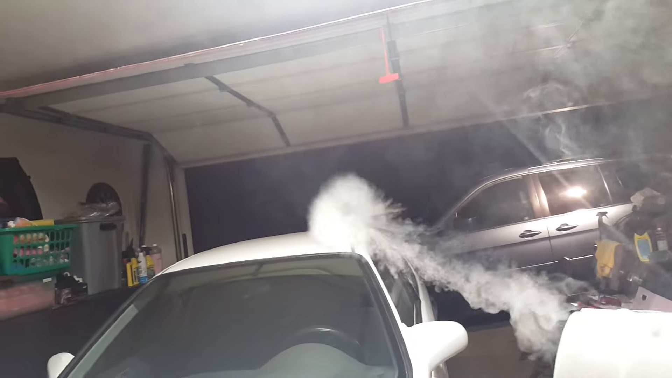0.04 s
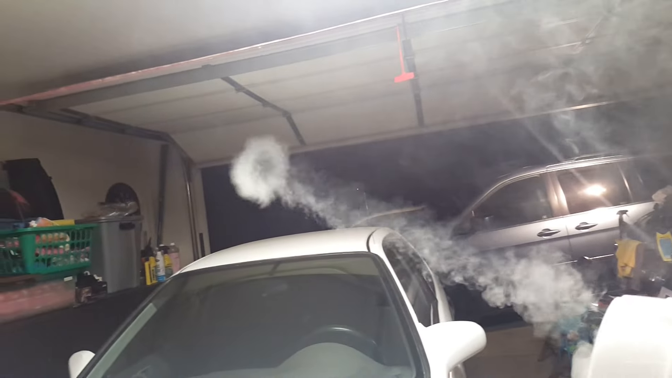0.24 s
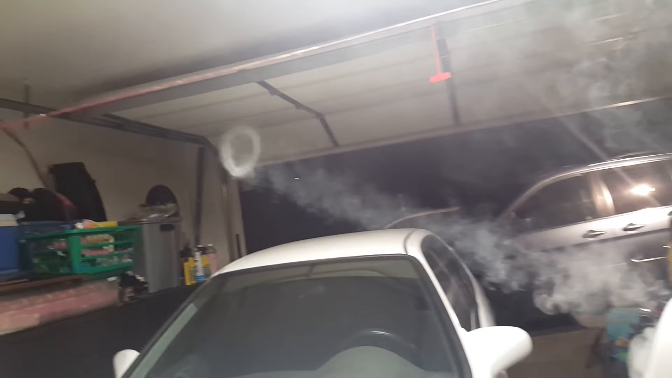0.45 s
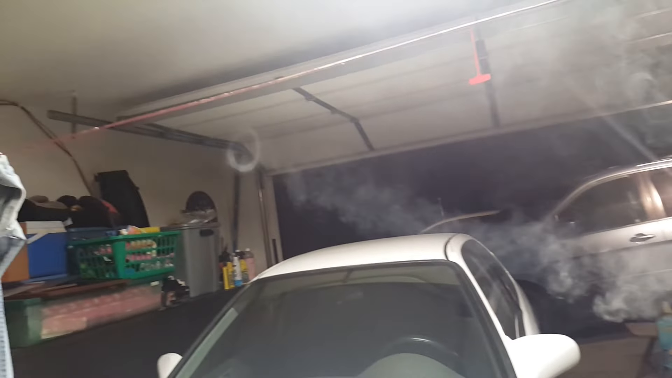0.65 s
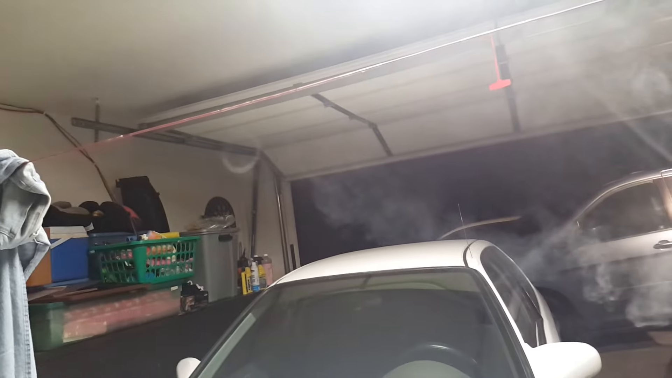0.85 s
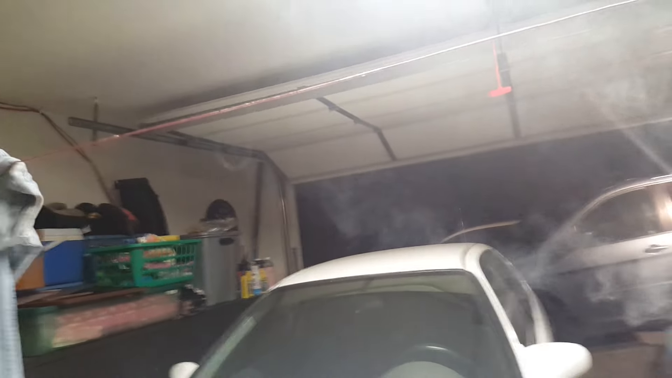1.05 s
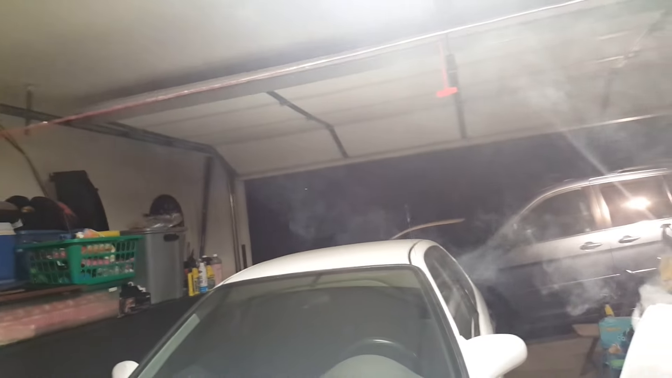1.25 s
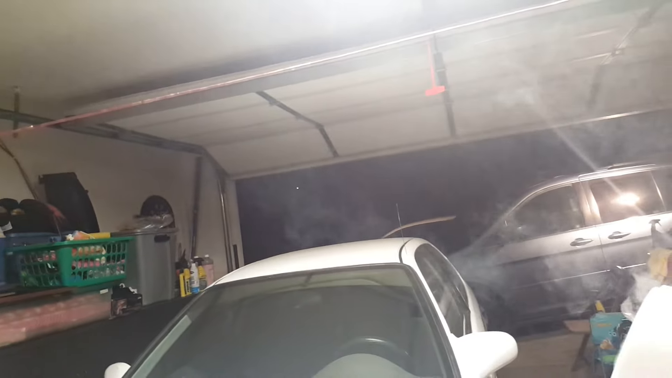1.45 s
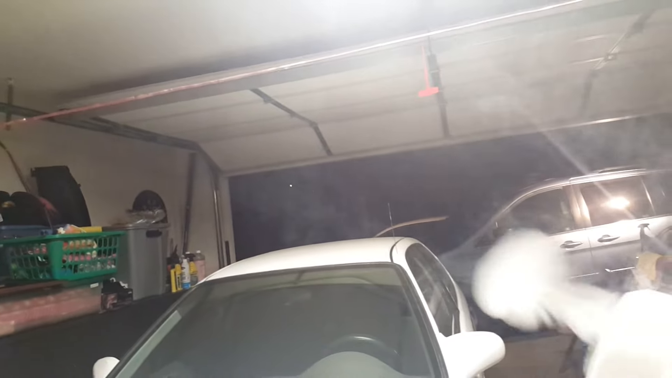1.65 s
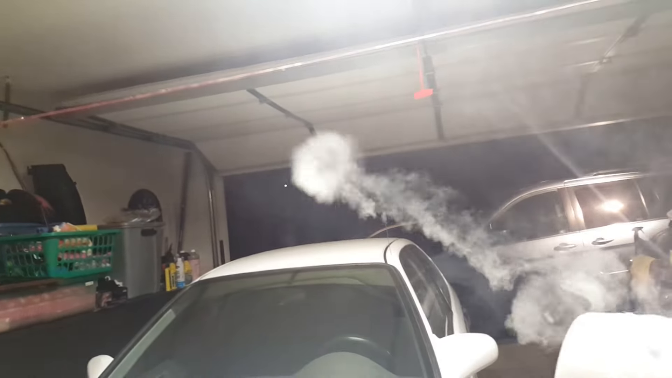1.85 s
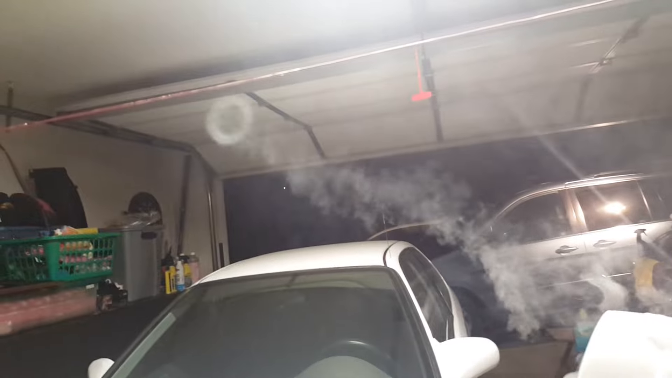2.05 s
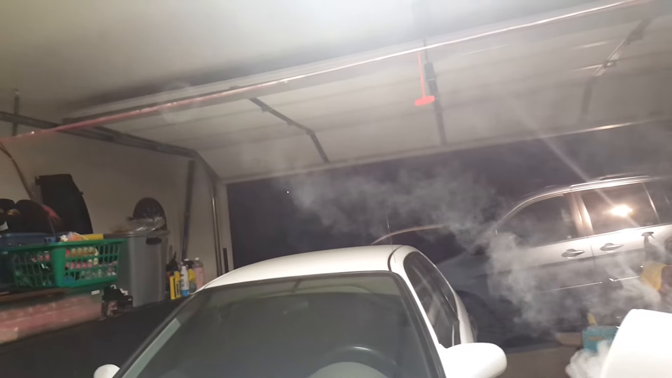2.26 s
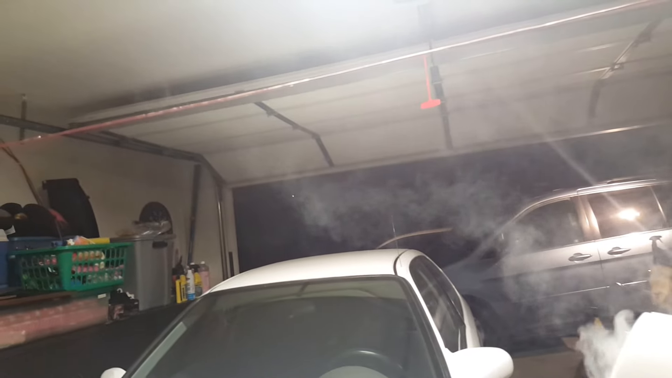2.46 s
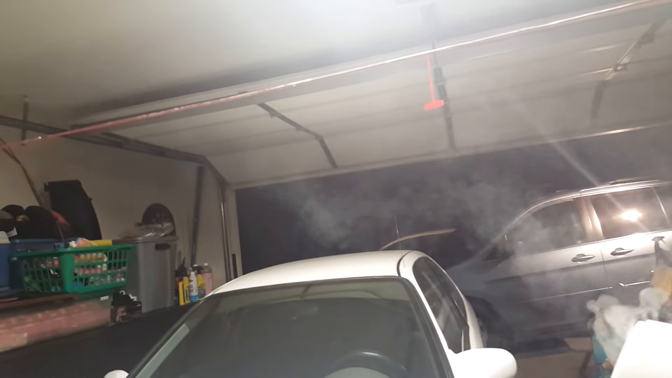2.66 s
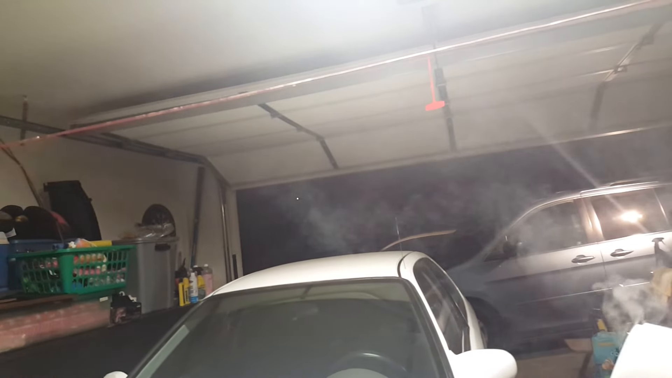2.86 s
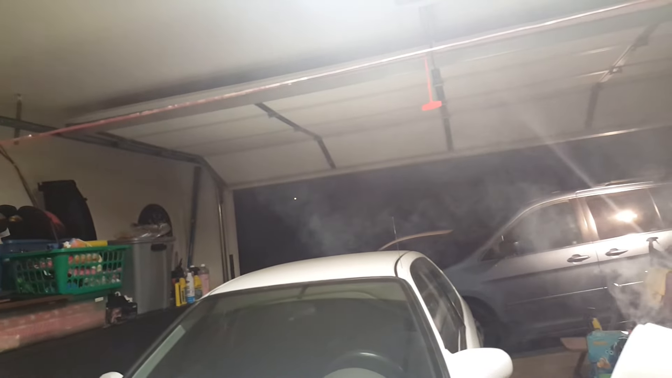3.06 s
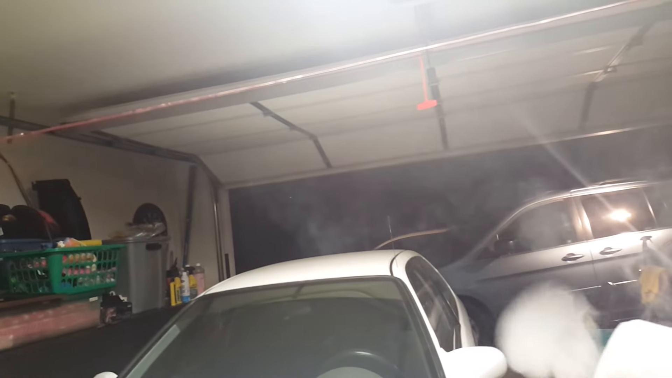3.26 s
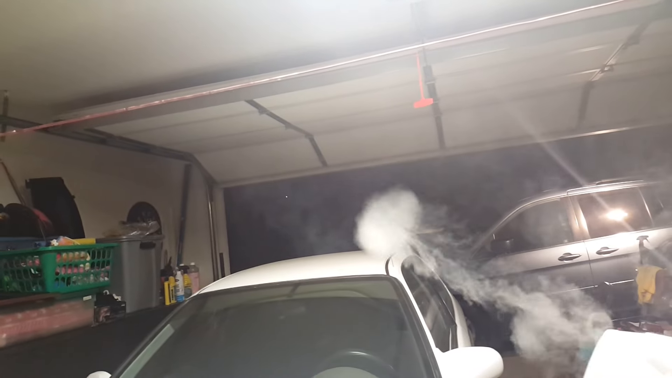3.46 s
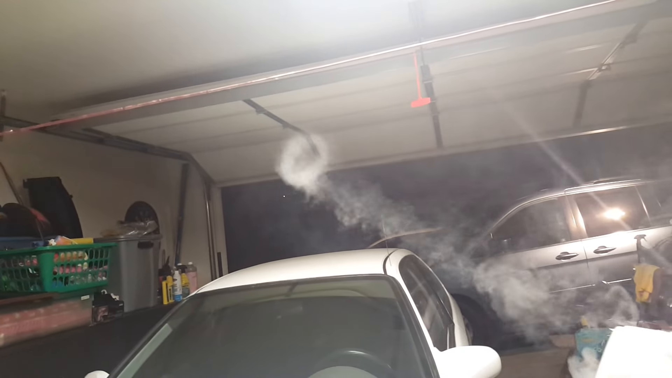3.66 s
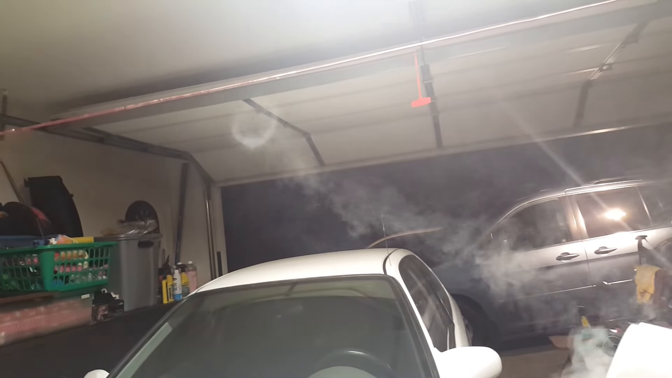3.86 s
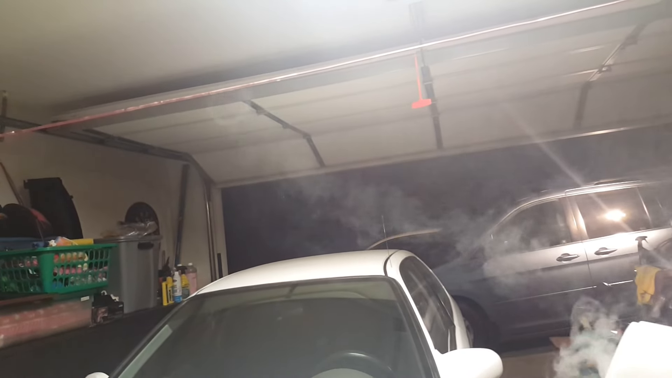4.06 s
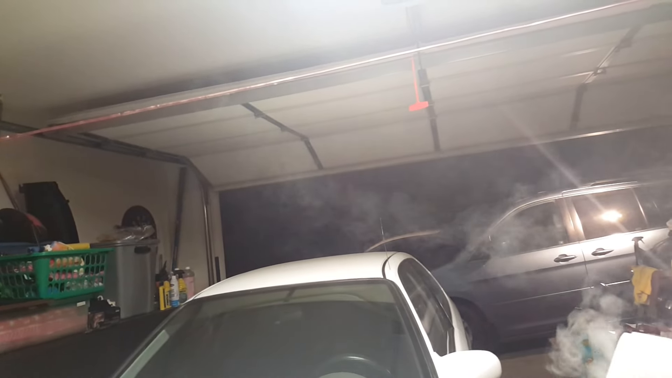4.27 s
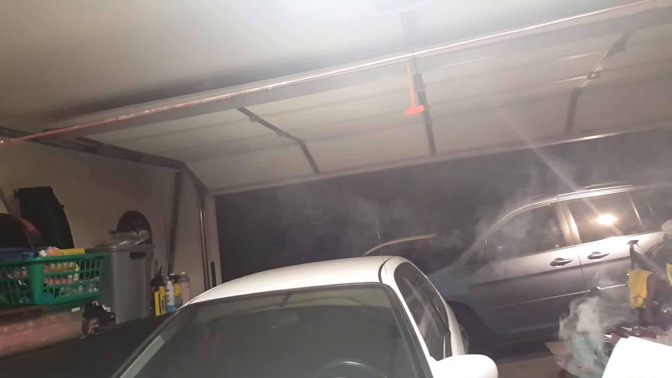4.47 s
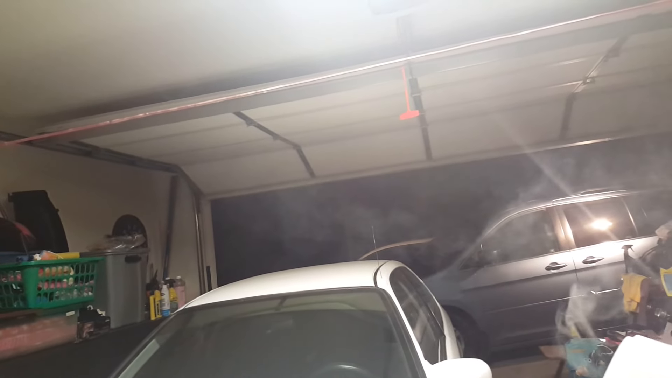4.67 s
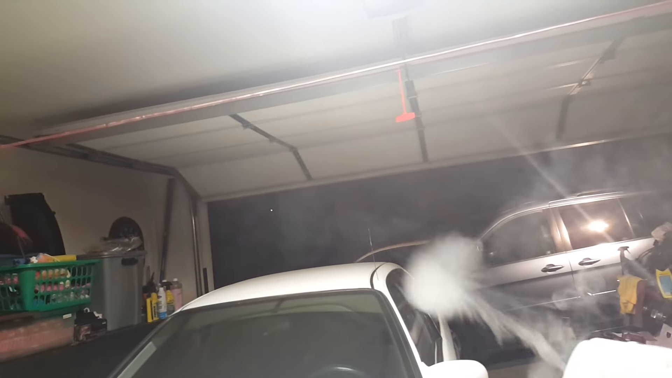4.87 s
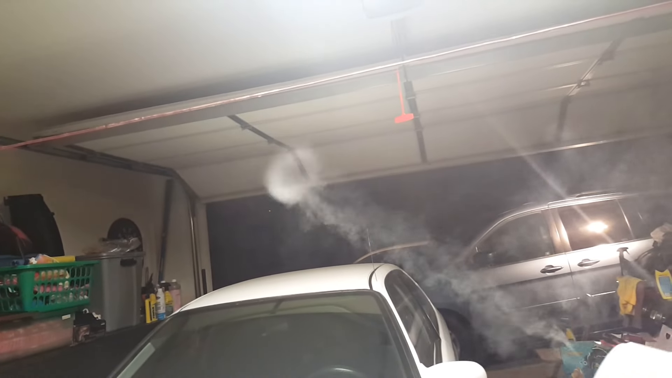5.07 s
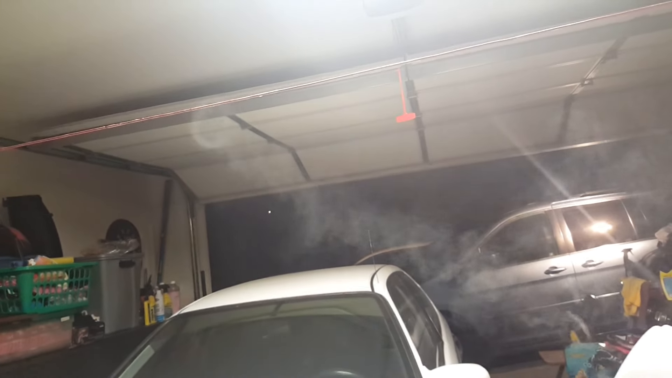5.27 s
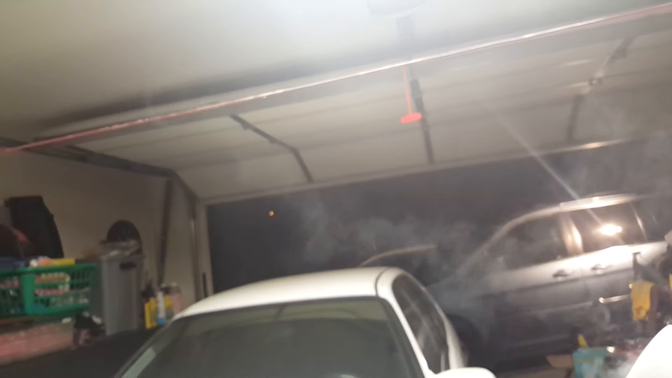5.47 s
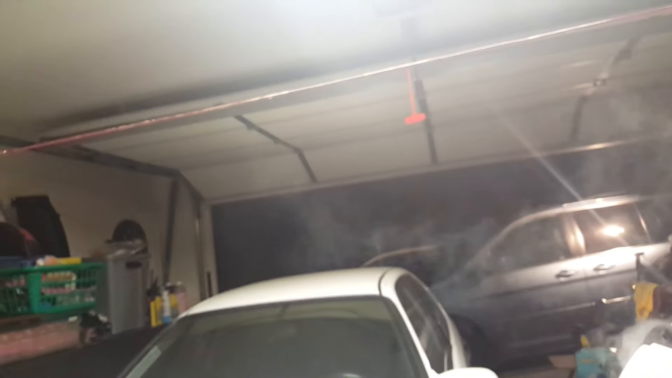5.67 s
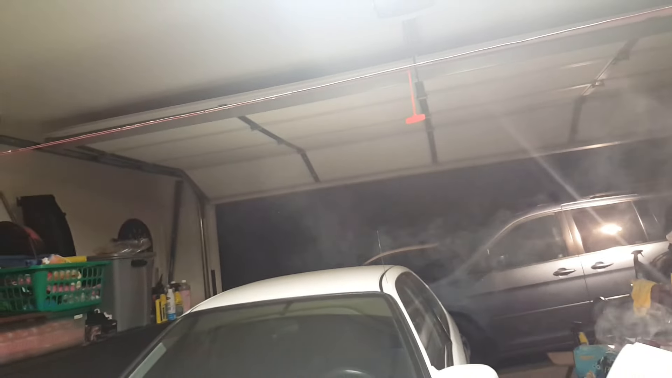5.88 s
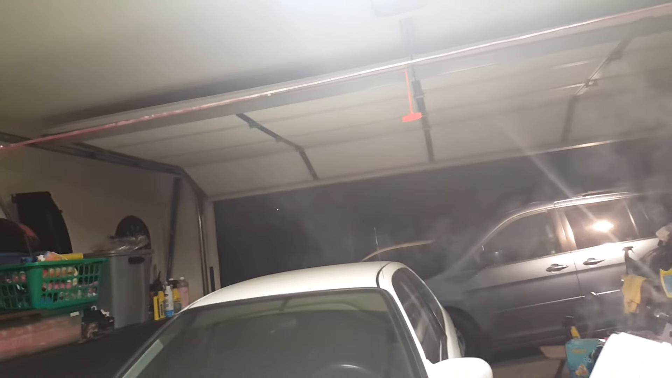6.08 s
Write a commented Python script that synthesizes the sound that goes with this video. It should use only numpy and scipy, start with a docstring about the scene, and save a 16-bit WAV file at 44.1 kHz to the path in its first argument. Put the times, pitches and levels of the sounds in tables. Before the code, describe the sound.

Three sharp, hollow thwacks from a barrel-shaped air cannon in a garage, with crinkly plastic sheet handling and bumps between, faint traffic behind.

```python
"""Air vortex cannon in a garage

A home-made air vortex cannon is fired three times; its sheet is drawn back before each shot and again at the end.
Folds buckle in tiny snaps that crinkle, and bumps wake the damped resonances of the barrel.
Let go, the sheet flutters forward and snaps taut: a crack, a hollow note and a puff of air fill the room.
Shaped noise makes the traffic rumble and tyre hiss outside; a gliding, wavering sine is one droning engine."""
import sys
import numpy as np
from scipy import signal
from scipy.fft import rfft, irfft, next_fast_len
from scipy.io import wavfile

SR = 44100
rng = np.random.default_rng(int(sys.argv[2]) if len(sys.argv) > 2 else 0)


def persist_wave(psi):
    """Save psi, clipped to +-1, as 16-bit WAV."""
    counts = np.round(np.clip(psi, -1, 1) * 32767).astype(np.int16)
    wavfile.write(sys.argv[1], SR, np.atleast_2d(counts).T)


N = 269892
TIME = np.arange(N) / SR
PATCHES = 6  # parts of the sheet that buckle independently
STEREO_HALVES = np.array([[0.5], [-0.5]])  # shares a left-right difference between the channels


def from_db(db):
    """Logarithmic level: decibels become an amplitude gain."""
    return 10 ** (np.asarray(db) / 20)


def rms_one(x):
    """Normalisation of power: scale to unit rms."""
    return x / np.sqrt(np.mean(x ** 2) + 1e-20)


def unit_energy(x):
    """Normalisation of energy: each channel's squares sum to one."""
    return x / np.sqrt(np.sum(x ** 2, axis=-1, keepdims=True) + 1e-20)


def in_time(rows):
    """Linear interpolation: join the rows of a curve by straight lines."""
    s, *columns = np.transpose(rows)
    return [np.interp(TIME, s, column) for column in columns]


def at_hz(points, hz):
    """Logarithmic frequency axis: interpolate a spectrum along it."""
    known_hz, values = np.transpose(points)
    return np.interp(np.log(hz + 1e-9), np.log(known_hz), values)


def cut(x, hz, kind, order=2):
    """Band limitation: a Butterworth filter."""
    return signal.sosfilt(signal.butter(order, hz, kind, fs=SR, output="sos"), x)


def brighten(x, treble_db, corner_hz=4000):
    """Spectral tilt: a shelf raises or lowers the treble."""
    dull = cut(x, corner_hz, "low", order=1)
    return dull + from_db(treble_db) * (x - dull)


def add(track, s, sound):
    """Superposition: mix a sound into a track at a time."""
    start = int(np.clip(s * SR, 0, N - 1))
    track[..., start:start + sound.shape[-1]] += sound[..., :N - start]


def through(x, response):
    """Linear system: convolve with an impulse response."""
    return signal.oaconvolve(np.atleast_2d(x), np.atleast_2d(response), axes=-1)[:, :N]


def ring(hz, t60, phase=0):
    """Damped resonance: a sine falls by 60 dB in t60 seconds."""
    t = TIME[:SR // 2]
    return np.sin(2 * np.pi * hz * t + phase) * from_db(-60 * t / t60)


def click_of(spectrum, size=2048):
    """Minimum phase: the most compact causal click of a given spectrum, with unit energy."""
    log_gain = np.log(from_db(at_hz(spectrum, np.fft.rfftfreq(size, 1 / SR))))
    cepstrum = irfft(log_gain)
    causal = 2 * cepstrum[:size // 2]  # folding the cepstrum makes the click causal
    return unit_energy(irfft(np.exp(rfft(causal, size))))


# Likeness of diffuse sound at the two microphones.
# Each row: frequency in Hz, correlation (1 is identical).
MICROPHONE_LIKENESS = [(60, 0.96), (200, 0.95), (400, 0.8), (700, 0.47), (1200, -0.049), (2500, -0.097),
                       (5000, -0.15), (15000, -0.2)]


def diffuse(spectrum, size):
    """Spatial coherence: stereo noise from all sides is alike in the bass, unrelated in the treble."""
    hz = np.fft.rfftfreq(size, 1 / SR)
    alike = np.clip(at_hz(MICROPHONE_LIKENESS, hz), -0.99, 0.99)
    mid, side = np.exp(2j * np.pi * rng.random((2, len(hz))))
    pair = np.sqrt(1 + alike) * mid + np.sqrt(1 - alike) * side * np.array([[1], [-1]])
    return rms_one(irfft(pair * from_db(at_hz(spectrum, hz)), size))


# Spectra of the traffic's rumble and of its tyre hiss.
# Each row: frequency in Hz, relative spectral level in dB.
RUMBLE_SPECTRUM = [(13, -58), (22, -11.5), (59, -9.5), (96, 0.5), (150, -9.5), (208, 0.5), (271, -8),
                   (400, -17.5), (468, -13.5), (500, -27), (650, -31), (1100, -120)]
HISS_SPECTRUM = [(210, -33), (350, -3), (404, -4), (467, -13.5), (514, -11), (613, -7.5), (674, -10),
                 (1070, -5.5), (1240, -11.5), (1730, -13), (3500, -25), (4380, -30), (5060, -30.5),
                 (6530, -35), (16000, -42)]
# Rise and fall of the traffic.
# Each row: time in seconds, relative rumble level in dB, relative tyre hiss level in dB.
TRAFFIC_LEVELS = [(0, -43, -47.5), (1, -43.5, -55.5), (2.2, -45.5, -53.5), (3.9, -46.5, -54),
                  (5.15, -47, -55), (6.12, -46, -53.5)]
# A far engine slows, picks up again and fades.
# Each row: time in seconds, pitch in Hz, relative level in dB.
ENGINE_COURSE = [(0, 138.8, -51), (.75, 122, -51.5), (1.45, 109, -40.5), (2.1, 105, -50), (2.8, 107.3, -47),
                 (4, 118.5, -57.5), (6.12, 112, -63)]


def outdoors(rumble_db=-1.5, hiss_db=2.5, engine_db=-2, waver=0.33, waver_hz=8.4):
    """Noise and tone sources: traffic is broadband, one engine is a low note of unsteady amplitude."""
    rumble_level, hiss_level = in_time(TRAFFIC_LEVELS)
    size = next_fast_len(N)
    rumble = from_db(rumble_level + rumble_db) * diffuse(RUMBLE_SPECTRUM, size)[:, :N]
    hiss = from_db(hiss_level + hiss_db) * diffuse(HISS_SPECTRUM, size)[:, :N]
    hz, level = in_time(ENGINE_COURSE)
    unsteady = 1 + waver * rms_one(cut(rng.standard_normal(N), waver_hz, "low"))
    drone = np.sqrt(2) * np.sin(2 * np.pi * np.cumsum(hz) / SR) * unsteady
    return rumble + hiss + from_db(level + engine_db) * drone


# Small dry ticks close by.
# Each row: start in seconds, peak level in dB, centre frequency in Hz.
CLOSE_TICKS = [(.249, -34, 1300), (2.032, -35, 1300), (3.628, -39, 7500)]


def ticks(t60=0.0036):
    """Direct sound alone: band-limited taps, too close and weak to wake the room."""
    out, t = np.zeros(N), TIME[:SR // 20]
    for s, db, hz in CLOSE_TICKS:
        noise = rng.standard_normal(len(t)) * from_db(-60 * t / t60)
        tap = cut(noise, [hz / 2, hz * 2], "band", order=4)
        add(out, s, from_db(db) * tap / np.max(np.abs(tap)))
    return out


# Reverberation time of the garage. Each row: frequency in Hz, t60 in seconds.
GARAGE_T60 = [(100, 0.14), (400, 0.2947), (1000, 0.2352), (2500, 0.3074), (5000, 0.3), (9000, 0.31),
              (15000, 0.21)]
# Colour of its diffuse sound. Each row: frequency in Hz, relative level in dB.
GARAGE_COLOUR = [(100, -3), (270, -2), (380, -8), (700, -8), (1100, -4), (1400, 0), (15000, 0)]
# The room reaches the microphones unevenly.
# Each row: frequency in Hz, relative left minus right level in dB.
GARAGE_LEAN = [(300, -2), (700, -2), (1400, 0.9), (2800, -3), (5500, -1), (10000, 2), (14000, 3)]


def echoes(gap_s=0.00049, build_s=0.0058):
    """Reverberation: echoes thicken for a moment, then decay exponentially, band by band."""
    t = TIME[:SR // 2]
    hz = np.fft.rfftfreq(len(t), 1 / SR)
    lean = from_db(at_hz(GARAGE_LEAN, hz) * STEREO_HALVES)
    field = rfft(diffuse(GARAGE_COLOUR, len(t))) * lean
    edges = np.geomspace(40, 20480, 28)
    tail = 0
    for low, high in zip(edges, edges[1:]):
        band = irfft(field * (hz >= low) * (hz < high), len(t))
        t60 = at_hz(GARAGE_T60, np.sqrt(low * high))
        tail = tail + band * from_db(-60 * t / t60)
    build = 1 - np.exp(-(np.maximum(t - gap_s, 0) / build_s) ** 2)
    return unit_energy(tail * build)


# Standing waves of the garage.
# Each row: frequency in Hz, level in dB above their common level.
STANDING_MODES = [(209, 0), (268, 0), (292, 2), (351, 0), (398, -12), (420, 0), (440, -6), (488, 1),
                  (582, -3), (630, 3), (688, 2), (716, -2), (760, -1), (832, -4), (920, -4), (1104, 4),
                  (1146, -4), (1235, -5)]


def standing_waves(level_db=8, t60=0.22, build_s=0.021):
    """Room modes: the shorter the wave, the more its phase differs between the microphones."""
    out = 0
    for k, (hz, db) in enumerate(STANDING_MODES):
        sign = (-1) ** k
        apart = np.arccos(np.clip(at_hz(MICROPHONE_LIKENESS, hz), -1, 1)) * STEREO_HALVES
        out = out + from_db(db) * ring(hz, t60, phase=sign * apart) * sign
    peak_gain = t60 * SR / (2 * np.log(1000))  # of a decaying sine at its own frequency
    return from_db(level_db) * out / peak_gain * (1 - np.exp(-TIME[:SR // 2] / build_s))


def garage(air, sheet, air_room_db, sheet_direct_db, sheet_room_db):
    """Direct and reverberant fields: the shaded sheet is heard mostly by the walls, each patch its own way."""
    direct = air + from_db(sheet_direct_db) * sheet.sum(axis=0)
    parts = [from_db(air_room_db) * air, *(from_db(sheet_room_db) * sheet)]
    reverberant = sum(through(part, echoes()) for part in parts)
    return direct + reverberant + through(sum(parts), standing_waves())


def buckling(envelope, per_s, spread_db):
    """Buckling instability: random tiny snaps of uneven size, one row for each patch of the sheet."""
    shape = (PATCHES, len(envelope))
    snaps = 1.0 * (rng.random(shape) < per_s / PATCHES / SR)
    count = int(snaps.sum())
    sizes = from_db(spread_db * np.minimum(rng.exponential(1, count), 3))
    snaps[snaps > 0] = sizes * rng.choice([-1, 1], count)
    return envelope * rms_one(snaps) / np.sqrt(PATCHES)


def burst(envelope, per_s, spread_db):
    """Impulsive source: a short run of snaps with unit energy in all."""
    snaps = buckling(envelope, per_s, spread_db)
    return snaps / (np.linalg.norm(snaps) + 1e-9)


# Resonances of the air in the barrel.
# Each row: multiple of its pitch, relative level in dB, t60 in seconds before the ring share.
BARREL_MODES = [(0.558, -19, 0.11), (0.731, -3, 0.03), (0.999, 3, 0.039), (1.7, -14.5, 0.0083),
                (2.6, 0.5, 0.017)]


def barrel(pitch_hz, ring_share, push_s, low_hz=170):
    """Cavity resonance: pushed air swells and rings for a few cycles; the mouth radiates little bass."""
    note = 0
    for ratio, db, t60 in BARREL_MODES:
        note = note + from_db(db) * ring(ratio * pitch_hz, t60 * ring_share)
    swell = 1 - np.exp(-TIME[:len(note)] / push_s)
    return cut(note * swell, low_hz, "high", order=3)


# The sheet is taken in hand and drawn back.
# Each row: first touch in seconds, grip in seconds, end in seconds, effort in dB.
SHEET_PULLS = [(.85, 0.878, 1.34, 2), (2.42, 2.521, 3.13, -6.5), (4.176, 4.222, 4.9, -1),
               (5.444, 5.621, 6.15, 1.5)]


def effort(touch_db=-14.5, attack_s=0.043, grip_hold_s=0.11, settle_s=0.036, draw_db=-16, let_up_s=0.13):
    """Applied force: each pull touches, grips, settles to a steady draw and lets up."""
    out = np.zeros(N)
    for touch_s, grip_s, end_s, db in SHEET_PULLS:
        age = TIME - grip_s
        settling = np.exp(-np.maximum(age - grip_hold_s, 0) / settle_s)
        grip = np.clip(age / attack_s, 0, 1) * settling
        steady = from_db(np.where(age < 0, touch_db, draw_db))
        in_hand = (TIME > touch_s) * np.clip((end_s - TIME) / let_up_s, 0, 1)
        out += from_db(db) * in_hand * np.maximum(grip, steady)
    return out


BUMP_HZ = 378.5  # the barrel's note under the hand


def jostling(level_db=-55, follows=0.68, spread=0.13, top_hz=1000):
    """Random excitation of a resonator: faint bumps keep the barrel murmuring while the sheet is pulled."""
    pitches = BUMP_HZ * (1 + spread * np.linspace(-1, 1, PATCHES))
    notes = np.array([barrel(hz, ring_share=1.0, push_s=0.0013) for hz in pitches])
    bumps = buckling(effort() ** follows, per_s=70, spread_db=2.5)
    return from_db(level_db) * cut(through(bumps, notes).sum(axis=0), top_hz, "low")


# Colour of the sheet's crinkling. Each row: frequency in Hz, relative spectral level in dB.
CRINKLE_COLOUR = [(200, -4), (400, 1.5), (1000, 5), (1400, 1.5), (2400, -1.5), (3600, -6.5), (5500, -10),
                  (9000, -12.5), (13000, -17), (16000, -20)]


def rustle(level_db=-36.0, top_hz=2200):
    """Shot noise: sparse, duller snaps go on while the sheet is pulled."""
    snaps = cut(buckling(effort(), per_s=220, spread_db=3), top_hz, "low", order=1)
    return from_db(level_db) * through(snaps, click_of(CRINKLE_COLOUR))


# Sharp tugs bump the barrel and buckle a fold at once; the first row is the tail of an earlier shot.
# Each row: start in seconds, relative bump level in dB, relative crinkle level in dB,
# relative crinkle treble against middle in dB.
SHEET_TUGS = [(.003, -29, -29.5, -7.5), (.883, -27.5, -34, -16), (0.911, -27, -32.5, -12),
              (.953, -22.5, -26, -9.5), (1.089, -28.5, -32, -15), (1.224, -25, -32, -11.5),
              (1.332, -34, -45, 8.5), (1.384, -26.5, -38.5, -28), (2.522, -26.5, -30.5, -11),
              (2.539, -22.5, -23.5, -9), (2.612, -21, -24.5, -21), (2.698, -25.5, -31.5, -3),
              (2.931, -39, -40, -32), (3.028, -29, -38.5, 0), (3.107, -27.5, -34.5, -17),
              (4.187, -35.5, -33, -30), (4.254, -20.5, -29, -9), (4.274, -17, -20.5, -12),
              (4.471, -30, -29.5, -8.5), (4.613, -27.5, -32, -23), (4.646, -26.5, -34.5, -21),
              (4.751, -24.5, -29, -11), (5.313, -41.5, -50.5, 2), (5.465, -39.5, -49, -33),
              (5.664, -35, -26.5, -7.5), (5.753, -23.5, -32.5, -3), (5.936, -36, -38.5, -.5),
              (6.102, -27.5, -31.5, -16)]


def knocks(level_db=5, pitch_scatter=0.066, top_hz=1000):
    """Impact on a resonator: each bump's hollow note lies a little higher or lower at random."""
    out = np.zeros(N)
    detunings = rng.uniform(-1, 1, len(SHEET_TUGS))
    for (s, db, *_), detuning in zip(SHEET_TUGS, detunings):
        pitch_hz = BUMP_HZ * (1 + pitch_scatter * detuning)
        add(out, s, from_db(db + level_db) * barrel(pitch_hz, ring_share=0.99, push_s=0.0025))
    return cut(out, top_hz, "low")


def crinkles(level_db=23.5, treble_db=7, fold_s=0.0034, doubling_db=17, rise_share=0.27):
    """Duration and bandwidth: each fold gives a run of snaps, quick and bright or slow and dull."""
    out, t = np.zeros((PATCHES, N)), TIME[:SR // 8]
    for s, _, db, bright_db in SHEET_TUGS:
        length = fold_s * 2 ** (-bright_db / doubling_db)  # doubles for every doubling_db less treble
        envelope = np.exp(-t / length) * (1 - np.exp(-t / (rise_share * length)))
        snaps = burst(envelope, per_s=3500, spread_db=3.5)
        add(out, s, from_db(db + level_db) * brighten(snaps, bright_db + treble_db, corner_hz=3020))
    return through(out, click_of(CRINKLE_COLOUR))


def puffs(level_db, length_s, top_hz=160):
    """Volume displacement: the slug of air leaving the mouth is one soft swing of pressure."""
    out = np.zeros(N)
    for s, _, thump_level, *_ in CANNON_SHOTS:
        age = (TIME - s) / length_s
        out += from_db(thump_level + level_db) * age * np.exp(-age ** 2)
    return cut(out, top_hz, "low")


# Colour of the sheet's crack. Each row: frequency in Hz, relative spectral level in dB.
CRACK_COLOUR = [(50, -50), (170, -6), (300, 5.5), (600, 5), (800, 5), (1080, 4), (1350, -2.5), (1900, -1),
                (2600, -4), (3600, -10), (5500, -14.5), (9000, -19.5), (13000, -24), (16000, -30)]
# The shots.
# Each row: time the sheet snaps taut in seconds, flutter before it in seconds, relative thump level in dB,
# relative rebound level in dB, relative crack level in dB, treble in dB, barrel pitch in Hz.
CANNON_SHOTS = [(1.6852, 0.02, -3, -22, -11.5, -2, 376), (3.3013, 0.019, -3, -11, -15.5, 3.5, 383),
                (4.8521, .018, -1, -12.5, -11.5, 1, 401.3)]


def shots(crack_db=29, flutter_db=-6, stir_db=-28, flick_db=-12, rebound_s=0.0165, slap_s=0.023,
          swell=0.31, stir_share=1.3, flick_share=0.753):
    """Membrane and cavity: the sheet stirs, flicks loose, flutters ever harder, snaps taut and rebounds once."""
    thumps, cracks, t = np.zeros(N), np.zeros((PATCHES, N)), TIME[:SR // 4]
    for s, lead, thump_level, rebound_level, crack_level, treble_db, pitch_hz in CANNON_SHOTS:
        pushes = [(-stir_share * lead, thump_level + stir_db), (-flick_share * lead, thump_level + flick_db),
                  (0, thump_level), (rebound_s, rebound_level)]
        for delay, db in pushes:
            add(thumps, s + delay, from_db(db) * barrel(pitch_hz, ring_share=0.88, push_s=0.0018))
        flutter = from_db(flutter_db) * (t / lead) ** swell
        envelope = np.where(t < lead, flutter, np.exp(-(t - lead) / slap_s))
        crack = burst(envelope, per_s=9000, spread_db=2.0)
        add(cracks, s - lead, from_db(crack_level + crack_db) * brighten(crack, treble_db))
    return thumps, through(cracks, click_of(CRACK_COLOUR))


def scene():
    """Superposition of sources: shots and handling share the garage; the street lies behind."""
    thumps, cracks = shots()
    air = thumps + knocks() + jostling()
    sheet = cracks + crinkles() + rustle()
    cannon = garage(air, sheet, air_room_db=-5, sheet_direct_db=-7, sheet_room_db=1.4)
    return cannon + puffs(level_db=-23, length_s=0.0025) + ticks() + outdoors()


def record(dry, low_hz=32, top_hz=16050):
    """Transducer limits: the deepest bass is lost, the highest peaks are rounded and the top is cut."""
    rounded = 1.12 * np.tanh(cut(dry, low_hz, "high", order=3) / 1.084)
    return signal.sosfilt(signal.ellip(10, 0.1, 80, top_hz, fs=SR, output="sos"), rounded)


dry = scene()
out = record(dry)
persist_wave(out)
```